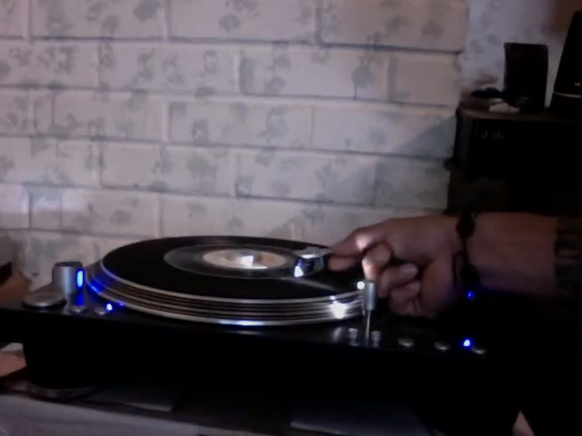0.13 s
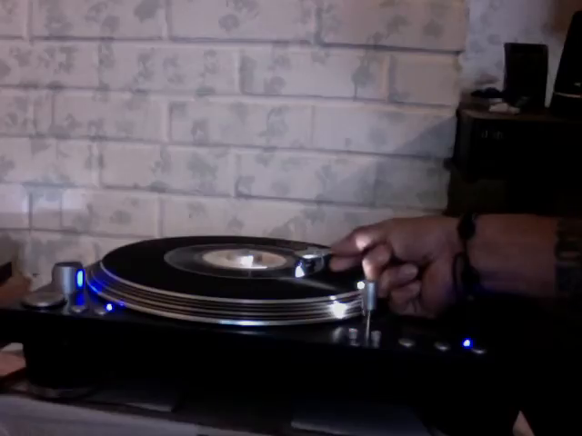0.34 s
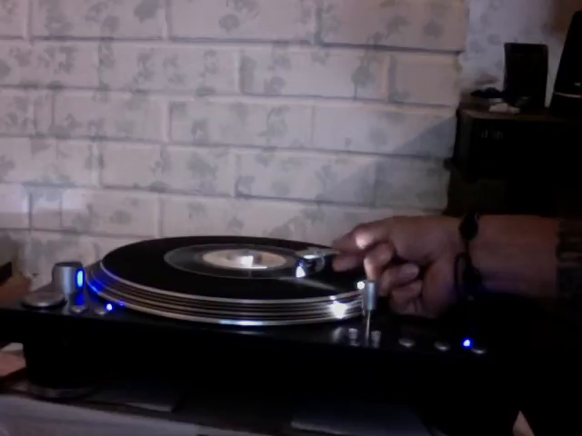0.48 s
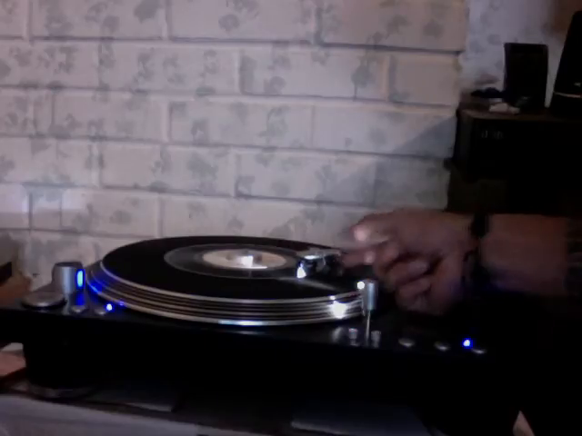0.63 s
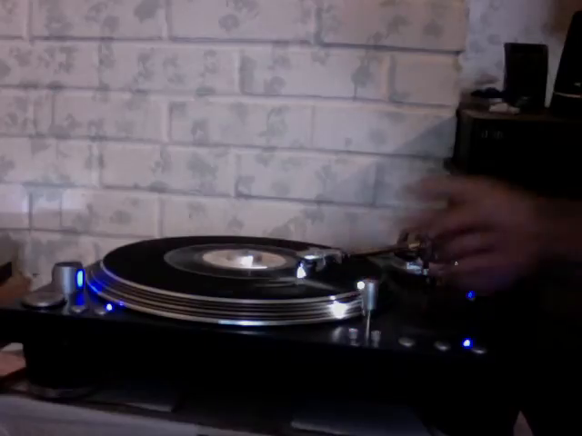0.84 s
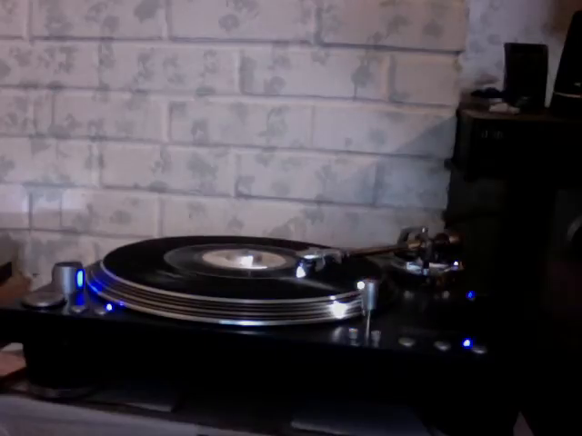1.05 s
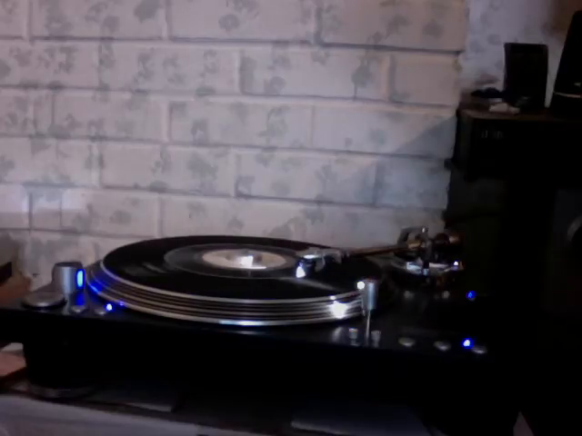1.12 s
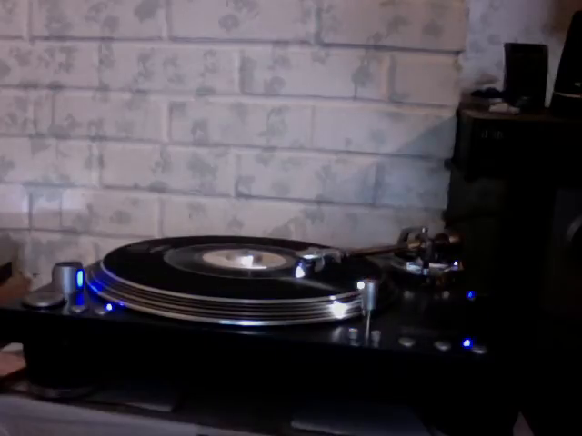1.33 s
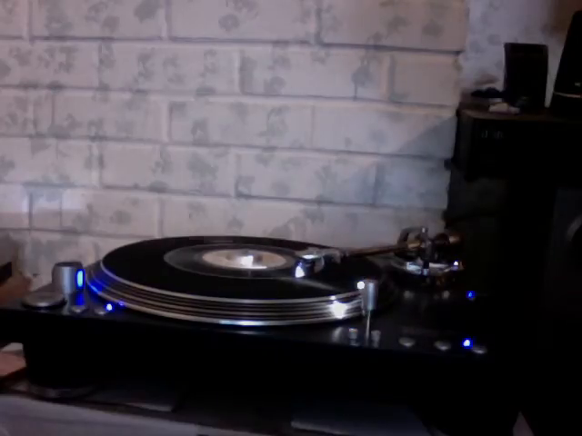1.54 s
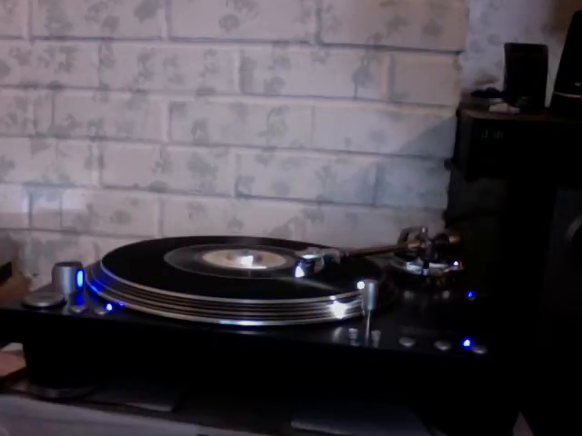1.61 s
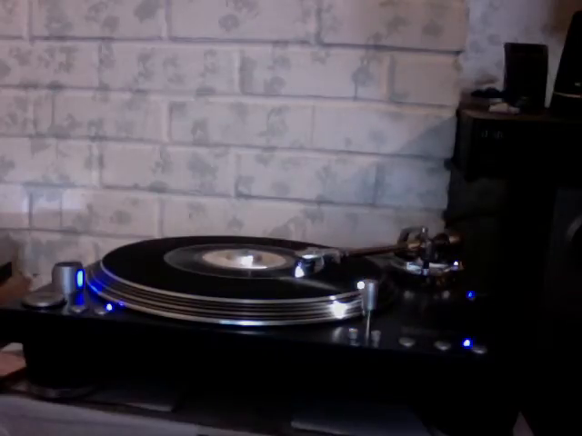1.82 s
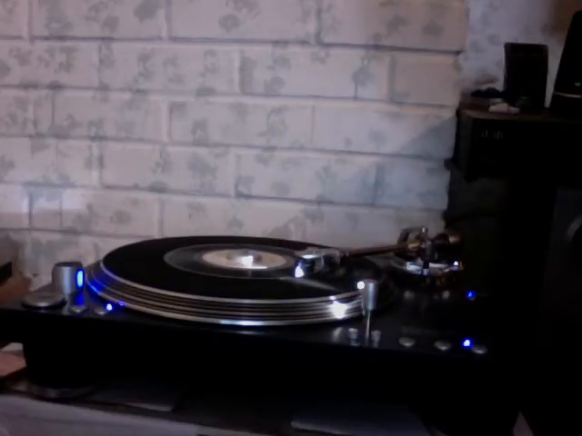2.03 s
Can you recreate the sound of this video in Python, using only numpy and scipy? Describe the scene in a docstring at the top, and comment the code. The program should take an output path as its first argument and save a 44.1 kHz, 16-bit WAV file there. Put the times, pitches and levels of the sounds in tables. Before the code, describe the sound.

A stylus lands on a spinning record: small ticks, two heavy low thumps, a brief bright slide and another knock, then thick pops and crackle thinning over soft rumble and hiss, taken directly from the pickup, left side only.

```python
"""A stylus is set down on a spinning record, heard straight from the pickup on the left channel.
Knocks are push-and-rebound humps with fading low sways; ticks and pops are tiny two-way flicks.
A bright slide and dusty crackle are crowds of random flicks; a stuttering scratch is a row of them.
Shaped noise makes the rumble and hiss. The right channel holds a thin leak and its own hiss."""
import sys
import numpy as np
from scipy import signal
from scipy.fft import rfft, irfft, next_fast_len
from scipy.io import wavfile

SR = 44100
rng = np.random.default_rng(int(sys.argv[2]) if len(sys.argv) > 2 else 0)


def master(y):
    """Save y as 16-bit WAV."""
    cut = np.clip(np.atleast_2d(y).T, -1, 1)
    pcm = np.round(cut * 32767)  # scale
    wavfile.write(sys.argv[1], SR, pcm.astype(np.int16))


N = 92610
T = np.arange(N) / SR  # time of each sample in seconds

# Steady surface noise. Each row: frequency in [Hz], relative level in [dB per Hz].
HISS_COLOUR = [(100, -3.5), (250, 1), (500, -6.5), (1000, -14), (2000, -20.5), (4000, -39), (8000, -33.5),
               (16000, -32)]
# Bearing and warp rumble. Each row: frequency in [Hz], relative level in [dB per Hz].
RUMBLE_COLOUR = [(10, -27), (22, 3), (33, -5), (48, -8.5), (70, -17), (115, -17), (170, -28.5), (400, -40),
                 (2000, -82)]
# How the rumble swells and sinks. Each row: time in [s], change of level in [dB].
RUMBLE_SWELL = [(.2, -4), (.3, 1), (1.4, -1), (1.75, 2), (2.1, -2.5)]
# Strength of the fine dust. Each row: time in [s], level in [dB] before the grain levels.
DUST_LEVEL = [(0, -45), (.07, -42.5), (.31, -43.5), (.34, -40.5), (.49, -40.5), (.6, -32.5), (.65, -40),
              (.74, -33.5), (.8, -41), (.88, -36), (.91, -41), (.96, -34), (1.06, -37), (1.2, -39),
              (1.33, -45.5), (1.45, -47.5), (1.52, -43.5), (1.6, -39), (1.66, -45), (1.9, -51), (2.1, -54)]
# Grain sizes of the crackle. Each row: width in [ms], grains in [per s], level against the dust
# in [dB], extra swing with the dust level as a [power].
DUST_GRAINS = [(.03, 950, -11, .4), (.08, 690, -4.5, 0.074), (0.208, 600, 2, 0.18)]
# Dusty patches the tip ploughs through. Each row: start in [s], length in [s], level in [dB],
# grain width in [ms].
DUST_PATCHES = [(0.06, 0.031, -34, 0.31), (0.225, 0.034, -40, 0.046), (0.663, 0.021, -28.5, 0.046),
                (0.735, 0.032, -24, 0.066), (0.938, .014, -37, 0.12), (1.075, 0.0049, -21.5, 0.087),
                (1.078, 0.015, -27.5, 0.018), (1.129, 0.025, -24.5, 0.082), (1.339, 0.032, -35, 0.17),
                (1.376, 0.031, -37, 0.04), (1.533, 0.0093, -30.5, 0.1), (1.553, 0.036, -30.5, 0.12)]
# Static ticks on the smooth rim. Each row: time in [s], level in [dB] before TICK_DB, width in [ms].
STATIC_TICKS = [(0.0167, -4.5, 0.029), (0.0541, -8.5, 0.02), (0.1391, -19.5, 0.069), (0.1682, -6, 0.059),
                (0.1873, -9.5, 0.016), (0.2025, -8.5, 0.078), (0.324, -16.5, 0.023), (0.3435, -12.5, 0.062),
                (0.4443, -6, 0.071)]
# Pops and sharp clicks, on the rim and in the groove. Each row: time in [s], level in [dB] before
# POP_DB, width in [ms], rebound as a [share of the push].
SHARP_POPS = [(0.4185, -9.5, 0.042, 0.59), (0.4208, -9.5, 0.06, 0.5), (0.422, -12.5, 0.085, 0.65),
              (0.5472, -6, 0.022, 1.16), (0.5592, -7.5, 0.039, 1.2), (0.5652, -4.5, 0.053, 0.09),
              (0.574, -17, 0.015, 0.72), (0.5965, -1.5, 0.076, 0.8), (0.6025, -9.5, 0.075, 1.3),
              (0.6301, -12, 0.04, 0.9), (0.6312, -23, 0.094, 2.5), (0.6366, -8.5, 0.076, 0.61),
              (0.6702, -14.5, 0.085, 1.3), (0.6712, -14, 0.1, 1.5), (0.6726, -6, 0.061, 0.12),
              (0.6743, -14, 0.08, 0.98), (0.7281, -8.5, 0.065, 0.6), (0.7392, -2, 0.1, 0.56),
              (0.7411, -8, 0.13, 0.26), (0.743, -2.5, 0.15, 1.06), (0.7446, -6.5, 0.11, 1.12),
              (0.8076, -11, 0.097, 0.6), (0.8537, -11, 0.14, 0.054), (0.8871, -14.5, 0.048, 1.5),
              (0.8902, -14, 0.051, 0.7), (0.938, -15.5, 0.13, 1.1), (0.9424, -14, 0.15, 0.55),
              (0.9741, -22, 0.091, 3.4), (0.9998, -8, 0.12, 1.25), (1.0157, -9, 0.12, 0.074),
              (1.031, -7.5, 0.097, 0.92), (1.046, -10.5, 0.09, 0.51), (1.049, -21, 0.1, 2.1),
              (1.0507, -7.5, 0.085, 0.6), (1.0735, -6, 0.12, 1.11), (1.0758, -9, 0.09, 0.27),
              (1.0857, -8.5, 0.066, 0.61), (1.1049, -7, 0.15, 0.32), (1.111, -17, 0.13, 1.4),
              (1.1282, 3.5, 0.12, 0.74), (1.1341, -8.5, 0.16, 0.69), (1.1356, -12, 0.089, 0.38),
              (1.1371, -8, 0.056, 0.1), (1.144, -4, 0.17, 1.02), (1.1607, -6, 0.13, 0.19),
              (1.1616, -16.5, 0.093, 1.5), (1.1812, -12.5, 0.11, 0.6), (1.236, -16, 0.17, 0.69),
              (1.2415, -17, 0.18, 1.2), (1.2503, -14, 0.14, 0.13), (1.2666, -14, 0.14, 1.33),
              (1.2724, -15.5, 0.2, 1.25), (1.3195, -19, 0.21, 1.25), (1.329, -17, 0.15, 1.6),
              (1.3828, -15.5, 0.05, 0.3), (1.4018, -10, 0.16, 0.28), (1.4096, -17, 0.15, 1),
              (1.5559, -10.5, 0.12, 0.27), (1.5615, -15, 0.16, 0.8), (1.5783, -12, 0.096, 0.13),
              (1.61, -17, 0.17, 0.16), (1.7664, -21.5, 0.088, 1.5), (1.773, -18, 0.12, 0.7),
              (1.8148, -20, 0.26, 0.49), (1.8633, -2.5, 0.033, 0.21)]
# Knocks of the stylus on the disc. Each row: time in [s] where push turns to rebound, push in [dB],
# push length in [ms], rebound in [dB], rebound length in [ms].
STYLUS_KNOCKS = [(0.2257, -7.5, 1.6, -3.5, 8.8), (0.2479, 2.5, 4.04, 1, 12.6),
                 (0.578, -4.5, 1.02, -8.5, 8.3), (0.618, -18, 7.6, -9.5, 17.6),
                 (0.8875, -33, 1.2, -11, 2.36), (1.1437, -28, 1.6, -23, 2.2), (1.3290, -18.5, 2, -18.5, 15),
                 (1.4016, -17.5, 0.95, -15.5, 4.4), (1.5327, -17, 2.7, -22, 6)]
# The tonearm sways and rings after a jolt. Each row: start in [s], starting level in [dB],
# frequency in [Hz], time to fall by 60 dB in [s].
ARM_SWAYS = [(.232, -3, 30, 0.068), (.260, -7.5, 20, 0.22), (0.583, -1, 33.5, 0.074), (.600, -25, 111, 0.5),
             (0.636, -9, 15.27, 0.69), (0.95, -30, 101, 0.31), (1.146, -9.5, 47, 0.065),
             (1.299, -17.5, 28, 0.63)]
# Colour of the pickup. Each row: frequency in [Hz], gain in [dB].
PICKUP_COLOUR = [(100, 6.5), (400, 1.5), (800, 0), (1600, 1.5), (3000, 1.5), (5000, 1), (8000, -1),
                 (12000, -1.5), (16000, -1)]
# Leak into the right channel, driven by the signal's slope. Each row: frequency in [Hz], gain in [dB].
LEAK_COLOUR = [(30, -10), (100, -28), (200, -37), (700, -36.5), (5600, -37), (16000, -36.5)]

HISS_DB, RUMBLE_DB, RIGHT_HISS_DB = -44.5, -30, -90
# Shape of one flick, as shares of its width; the rebound is slower than the push
EDGE_SHARE, ROUND_SHARE, REBOUND_STRETCH = 0.31, 0.16, 1.534
GRIT, GRIT_HZ = 0.21, 6900  # depth of the chatter, and where its treble starts to fade
GRAIN_SPREAD_DB, GRAIN_REBOUND = 4.5, 0.63
PATCH_SPREAD_DB, PATCH_PER_S = 3.8, 1800
SLIDE_START_S, SLIDE_END_S = 0.49, 0.577
SLIDE_DB, SLIDE_RISE_DB = -23.5, 18  # level at the end, and the climb up to it
SLIDE_WIDTH_MS, SLIDE_PER_S, SLIDE_SPREAD_DB = 0.034, 5500, 7.0
SCRAPE_S, SLIP_COUNT, SLIP_HZ = 0.7460, 10, 569
SLIP_JITTER = 0.15  # unevenness, as a share of the gap between slips
SLIP_DB, SLIP_FALL_DB_PER_S, SLIP_SPREAD_DB = -9, 260, 2
SLIP_WIDTH_MS, SLIP_WIDTH_SPREAD_OCTAVES, SLIP_REBOUND = 0.15, 0.54, 0.69
TICK_DB, TICK_REBOUND, POP_DB = 1.5, 0.25, -0.5
PUSH_SKEW, REBOUND_SKEW = 0.97, 0.56  # below 1 moves a hump's peak nearer the turning point
COUPLING_HZ, CUTOFF_HZ = 2.7, 16200


def from_db(db):
    """Turn decibels into gain."""
    return 10 ** (np.asarray(db) / 20)


def rms_one(x):
    """Scale a sound to an rms (average strength) of 1."""
    return x / np.sqrt(np.mean(x ** 2) + 1e-20)


def level(rows):
    """Draw a gain over time through points of seconds and dB."""
    return from_db(np.interp(T, *np.transpose(rows)))


def colour(x, points):
    """Filter a sound by a curve joining points of Hz and dB."""
    hz, db = np.transpose(points)
    size = next_fast_len(N + SR // 2)  # spare room keeps the end from wrapping to the start
    bins_hz = np.maximum(np.arange(size // 2 + 1) * SR / size, 1)
    gain = from_db(np.interp(np.log(bins_hz), np.log(hz), db))
    return irfft(rfft(x, size) * gain, size)[:N]


def add(out, s, pulse):
    """Mix in a pulse centred on time s, leaving out any part beyond the ends."""
    start = int(round(s * SR)) - len(pulse) // 2
    lo, hi = max(start, 0), min(start + len(pulse), N)
    if hi > lo:
        out[lo:hi] += pulse[lo - start:hi - start]


def flick(width_ms, rebound, size=160):
    """A speck pushes the tip aside, then it snaps back the other way; wider specks are rounder."""
    ms = np.arange(-size, size + 1) * 1000 / SR
    side_width = np.where(ms < 0, width_ms, width_ms * REBOUND_STRETCH)
    u = np.abs(ms) / side_width
    bump = np.exp(-u) - np.exp(-u / EDGE_SHARE)
    push_and_rebound = np.where(ms < 0, -1, rebound) * bump / bump.max()
    # The tip rounds off the corners
    tip = np.exp(-.5 * (ms / (ROUND_SHARE * width_ms)) ** 2)
    return np.convolve(push_and_rebound, tip / tip.sum(), "same")


def grains(width_ms, per_s, spread_db):
    """Random specks of one width and uneven strength push the tip either way; rms is 1."""
    sizes = from_db(spread_db * np.minimum(rng.exponential(1, N), 3.5))
    present = rng.random(N) < per_s / SR
    hits = present * sizes * rng.choice([-1, 1], N)
    return rms_one(signal.fftconvolve(hits, flick(width_ms, GRAIN_REBOUND), "same"))


def gritty(x):
    """The tip chatters while it is deflected: noise roughens the strength of the sound."""
    lowpass = signal.butter(1, GRIT_HZ, fs=SR, output="sos")
    chatter = rms_one(signal.sosfilt(lowpass, rng.standard_normal(N)))
    return x * (1 + GRIT * chatter)


def background():
    """Surface hiss and turntable rumble are random noise with two different colours."""
    hiss = from_db(HISS_DB) * rms_one(colour(rng.standard_normal(N), HISS_COLOUR))
    rumble = rms_one(colour(rng.standard_normal(N), RUMBLE_COLOUR))
    return hiss + from_db(RUMBLE_DB) * level(RUMBLE_SWELL) * rumble


def crackle():
    """Fine dust flicks the tip all along, duller where it thins out, thicker in patches."""
    out = np.zeros(N)
    dust = level(DUST_LEVEL)
    for width_ms, per_s, db, follow in DUST_GRAINS:
        extra_swing = (dust / dust.mean()) ** follow
        out += from_db(db) * dust * extra_swing * grains(width_ms, per_s, GRAIN_SPREAD_DB)
    for s, length, db, width_ms in DUST_PATCHES:
        progress = np.clip((T - s) / length, 0, 1)
        swell = np.sqrt(np.abs(np.sin(np.pi * progress)))
        out += from_db(db) * swell * grains(width_ms, PATCH_PER_S, PATCH_SPREAD_DB)
    return out


def scrape():
    """A scratch drags the tip: it sticks and slips at an uneven rate, with a fading trend."""
    out = np.zeros(N)
    for k, (shift, strength, width) in enumerate(rng.standard_normal((SLIP_COUNT, 3))):
        age = (k + SLIP_JITTER * shift) / SLIP_HZ
        gain = from_db(SLIP_DB - SLIP_FALL_DB_PER_S * age + SLIP_SPREAD_DB * strength)
        width_ms = SLIP_WIDTH_MS * 2 ** (SLIP_WIDTH_SPREAD_OCTAVES * width)
        add(out, SCRAPE_S + age, gain * flick(width_ms, SLIP_REBOUND))
    return out


def clicks():
    """Static ticks lean mostly to one side, at random; pops push and rebound by varying shares."""
    out = np.zeros(N)
    signs = rng.choice([-1, 1], len(STATIC_TICKS))
    for (s, db, width_ms), sign in zip(STATIC_TICKS, signs):
        add(out, s, sign * from_db(db + TICK_DB) * flick(width_ms, TICK_REBOUND))
    for s, db, width_ms, rebound in SHARP_POPS:
        add(out, s, from_db(db + POP_DB) * flick(width_ms, rebound))
    return out


def slide():
    """The tip skates over the rim through dense specks, louder until the groove catches it."""
    progress = np.clip((T - SLIDE_START_S) / (SLIDE_END_S - SLIDE_START_S), 0, 1)
    sliding = (progress > 0) * (progress < 1)
    swell = from_db(SLIDE_DB - SLIDE_RISE_DB * (1 - progress)) * sliding
    return swell * grains(SLIDE_WIDTH_MS, SLIDE_PER_S, SLIDE_SPREAD_DB)


def lobe(s, ms, skew):
    """One smooth hump of movement, starting at time s, or ending there if its length is negative."""
    return np.sin(np.pi * np.clip((T - s) * 1000 / ms, 0, 1) ** skew)


def thumps():
    """Each knock bends the cantilever and lets it spring back; jolts set the arm swaying."""
    out = np.zeros(N)
    for s, push_db, push_ms, rebound_db, rebound_ms in STYLUS_KNOCKS:
        push = from_db(push_db) * lobe(s, -push_ms, PUSH_SKEW) ** 2
        rebound = from_db(rebound_db) * lobe(s, rebound_ms, REBOUND_SKEW)
        out += rebound - push
    for s, db, hz, t60 in ARM_SWAYS:
        age = np.maximum(T - s, 0)
        fade = np.exp(-np.log(1000) * age / t60)
        out -= from_db(db) * fade * np.sin(2 * np.pi * hz * age)
    # Very slow movement is weakened
    coupling = signal.butter(1, COUPLING_HZ, "high", fs=SR, output="sos")
    return signal.sosfilt(coupling, out)


def scene():
    """Everything reaches the left channel; the right holds only a thin leak and its own hiss."""
    tip_sounds = gritty(clicks() + crackle() + slide() + scrape())
    left = colour(tip_sounds, PICKUP_COLOUR) + thumps() + background()
    # A capacitive leak follows how fast the left signal changes
    slope = np.diff(left, prepend=left[0])
    right_hiss = from_db(RIGHT_HISS_DB) * rng.standard_normal(N)
    return np.array([left, colour(slope, LEAK_COLOUR) + right_hiss])


def record(dry):
    """The input clips at full scale, then the top of the treble is cut."""
    lowpass = signal.butter(14, CUTOFF_HZ, fs=SR, output="sos")
    return signal.sosfiltfilt(lowpass, np.clip(dry, -1, 1))


dry = scene()
out = record(dry)
master(out)
```